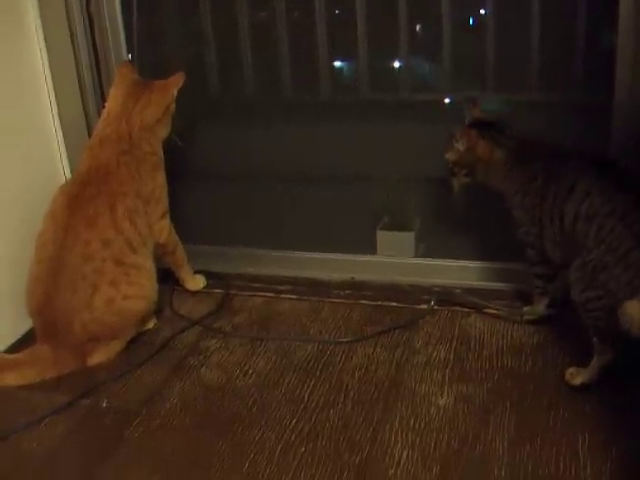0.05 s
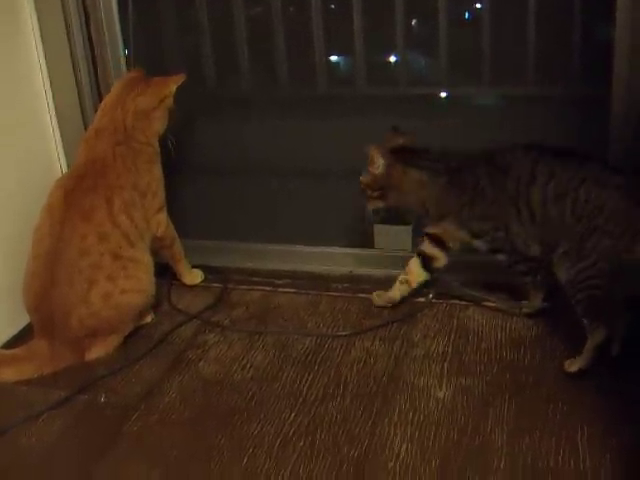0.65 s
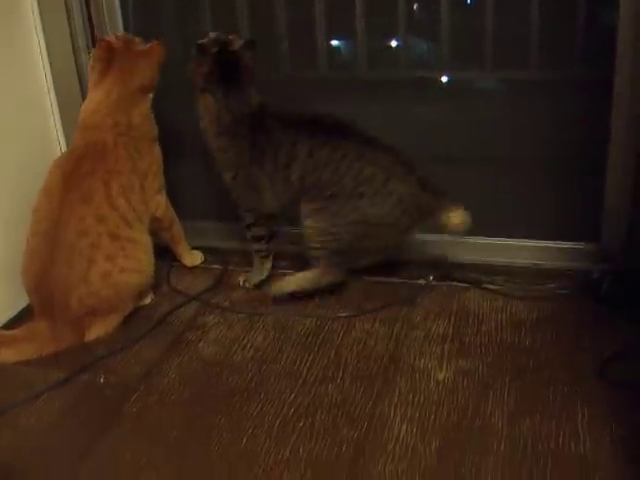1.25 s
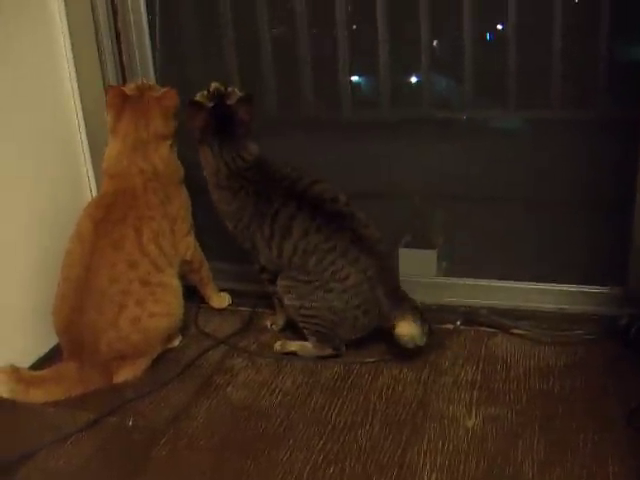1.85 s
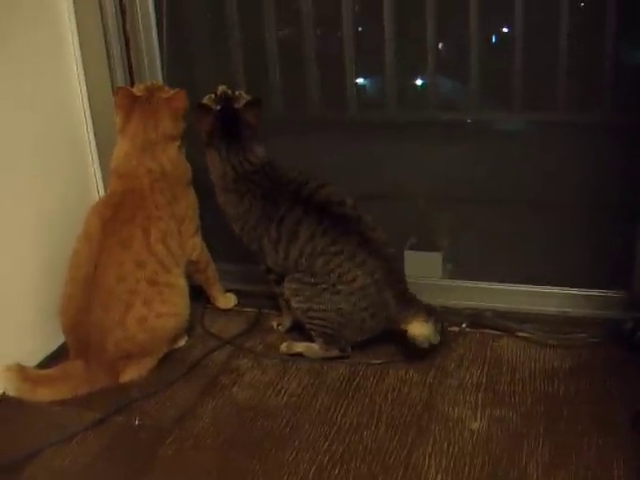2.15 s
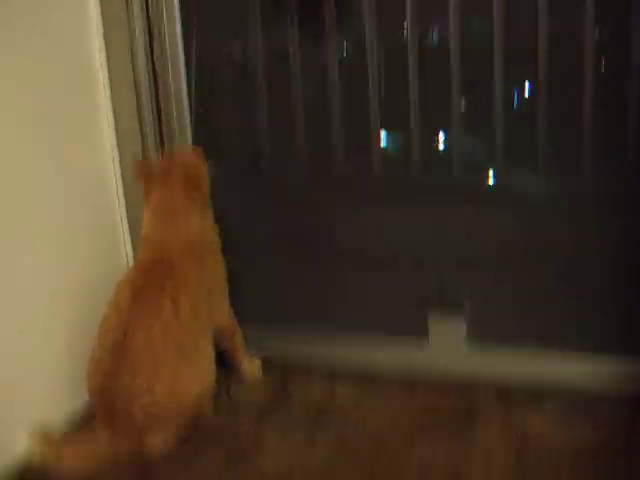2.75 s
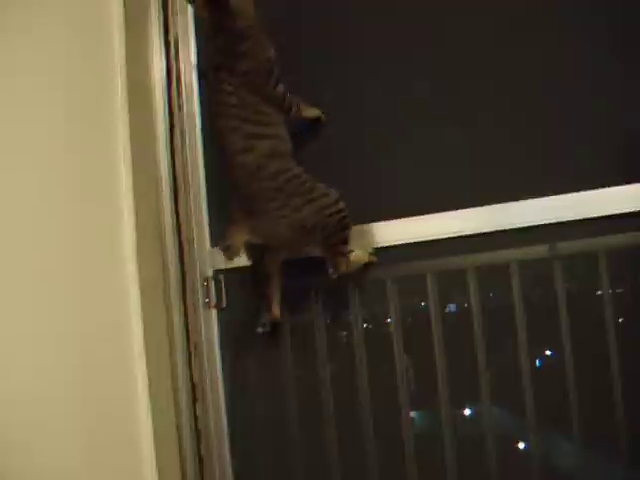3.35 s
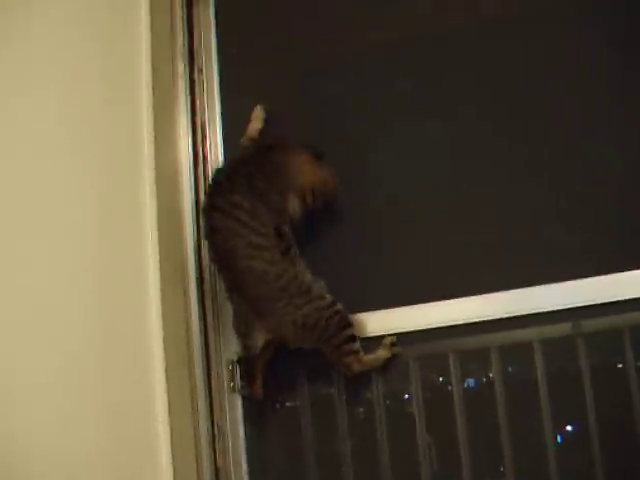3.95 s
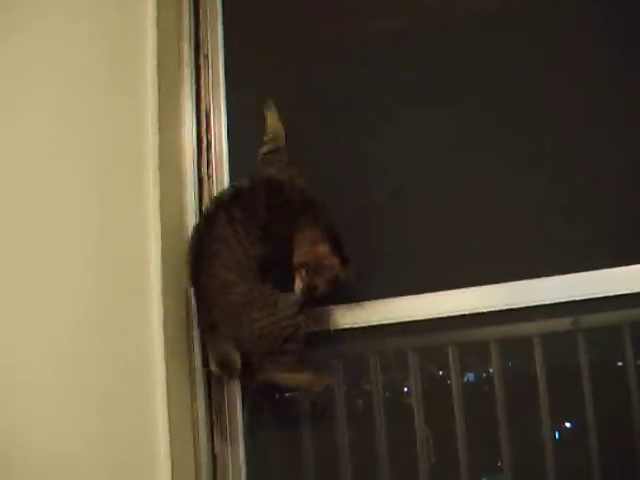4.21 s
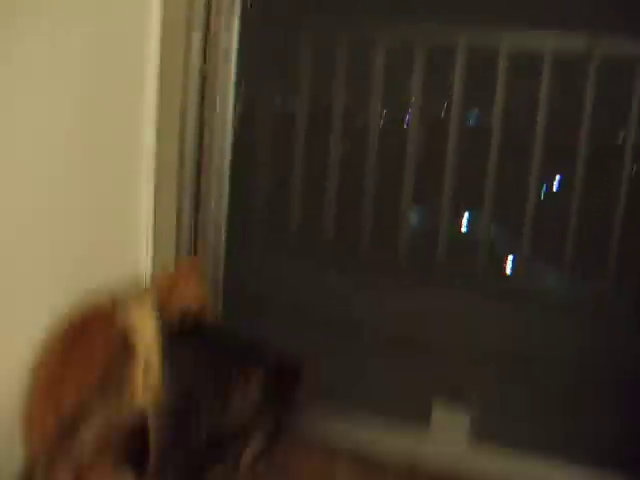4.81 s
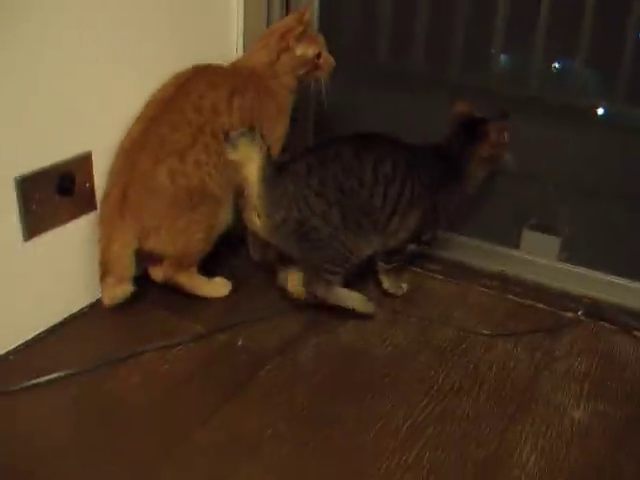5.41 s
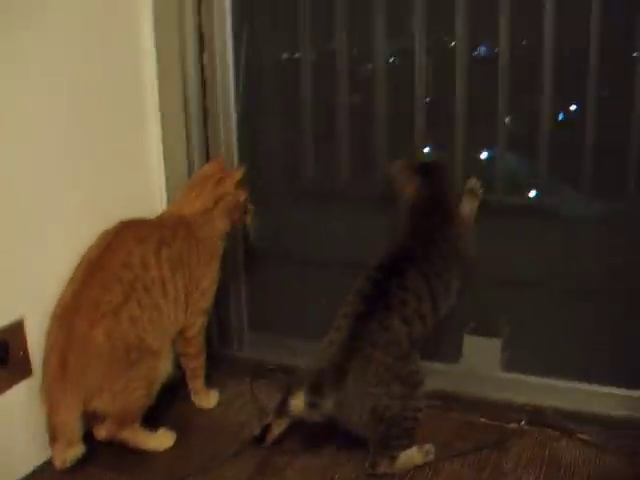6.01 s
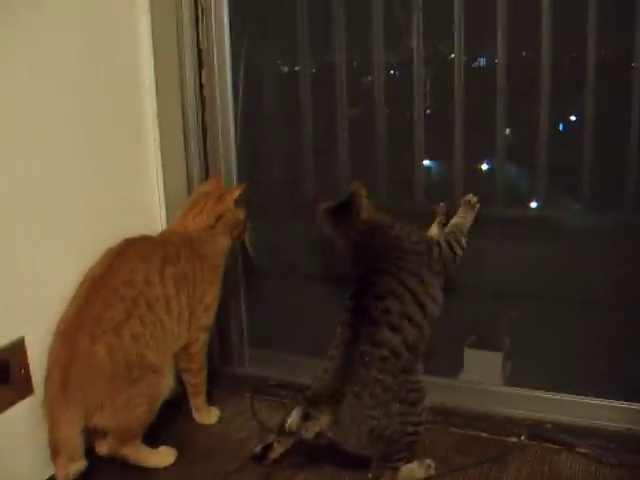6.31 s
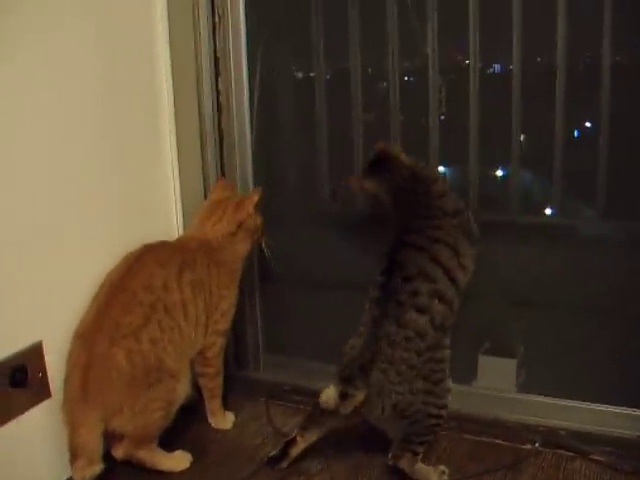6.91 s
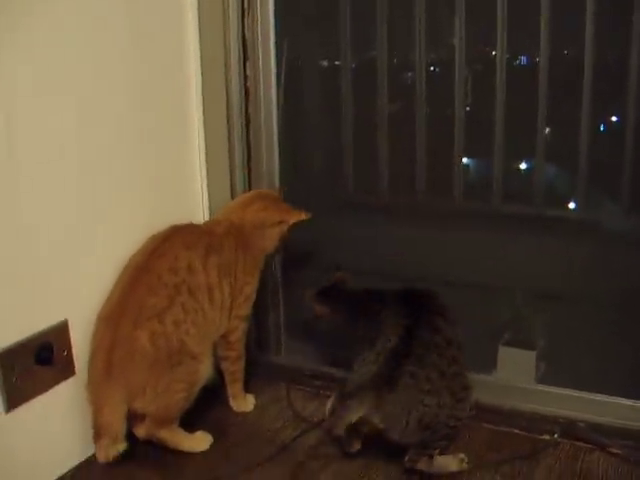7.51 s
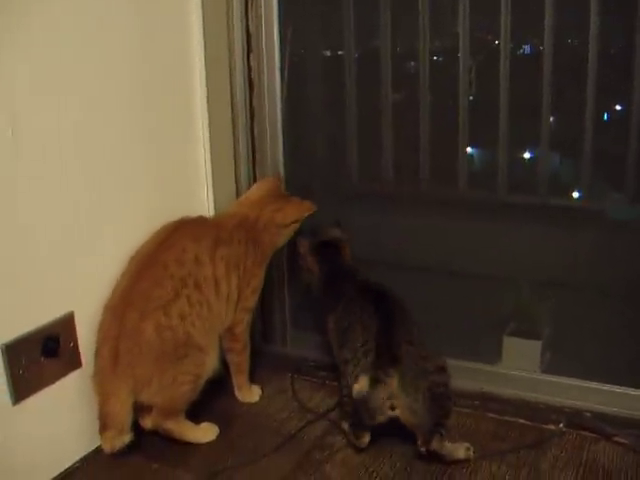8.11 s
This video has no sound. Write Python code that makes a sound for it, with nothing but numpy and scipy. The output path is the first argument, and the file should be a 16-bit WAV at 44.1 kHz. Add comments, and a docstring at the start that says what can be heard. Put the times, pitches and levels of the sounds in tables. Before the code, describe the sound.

In a small, quiet room a cat takes a few clicking steps, then climbs a window screen. Its claws pluck and scrape the mesh, and the metal frame rattles lightly. It drops onto the wooden floor with a loud thump, pads about, then plucks the screen a few more times, making it thrum and zing. The microphone is mid-room, with steady hiss and faint distant traffic behind.

```python
"""A small room at night. A cat leaps onto the window screen: its claws pluck and scrape the mesh
and rattle the metal frame. It drops to the wooden floor with a thump, pads about with tapping claws,
then stretches up and plucks the screen again; hard plucks set it thrumming and zinging.
The room answers; far traffic murmurs outside under a steady hiss and a faint electronic whine."""
import sys
import numpy as np
from scipy import signal
from scipy.fft import rfft, irfft, next_fast_len
from scipy.io import wavfile
from scipy.ndimage import map_coordinates

SR = 44100
rng = np.random.default_rng(int(sys.argv[2]) if len(sys.argv) > 2 else 0)


def wrap_up_sound(samples):
    """Save the sound to the file named by the first command line argument, as 16-bit audio."""
    columns = np.atleast_2d(samples).T
    # keep every value between -1 and 1, then stretch to whole-number steps
    tamed = np.clip(columns, -1, 1)
    steps = np.round(tamed * 32767).astype(np.int16)
    wavfile.write(sys.argv[1], SR, steps)


N = 359856
CLOCK_S = np.arange(N) / SR
AGE_S = np.arange(SR // 2) / SR  # time since a hit


def amp(db):
    """Decibels to gain."""
    return 10 ** (np.asarray(db) / 20)


def unit(x):
    """Scale to rms 1."""
    return x / np.sqrt(np.mean(x ** 2) + 1e-20)


def along(points, hz):
    """Interpolate (frequency [Hz], value) points on a log axis."""
    knots_hz, values = np.transpose(points)
    return np.interp(np.log(hz + 1), np.log(knots_hz + 1), values)


def fade(t60_s):
    """Exponential decay of a hit."""
    return np.exp(-np.log(1000) * AGE_S / t60_s)


def wobble(knots_per_s):
    """Smooth random curve."""
    knots = rng.standard_normal(int(N * knots_per_s / SR) + 4)
    return map_coordinates(knots, [CLOCK_S * knots_per_s])


def filtered(x, response):
    """Apply a frequency response."""
    size = next_fast_len(x.shape[-1] + SR // 4)
    hz = np.fft.rfftfreq(size, 1 / SR)
    return irfft(rfft(x, size) * response(hz), size)[..., :x.shape[-1]]


def coloured(x, *spectra):
    """Minimum-phase filter from summed (frequency [Hz], gain [dB]) spectra."""
    def response(hz):
        gain_db = sum(along(spectrum, hz) for spectrum in spectra)
        cepstrum = irfft(np.log(amp(gain_db)))
        cepstrum[1:] *= 2
        cepstrum[len(cepstrum) // 2:] = 0
        return np.exp(rfft(cepstrum))
    return filtered(x, response)


def burst(spectrum, t60_s):
    """Decaying coloured noise."""
    return coloured(rng.standard_normal(len(AGE_S)) * fade(t60_s), spectrum)


def add(track, time_s, sound):
    """Mix a sound in at time_s."""
    part = track[round(time_s * SR):][:len(sound)]
    part += sound[:len(part)]


def ring(modes, detune):
    """Damped modes of alternating sign, slightly detuned at each strike."""
    mode_hz, level_db, t60_s = np.transpose(modes)
    pitch_hz = mode_hz * np.exp(detune * rng.standard_normal(len(mode_hz)))
    gains = amp(level_db) * (-1) ** np.arange(len(mode_hz))
    waves = [np.sin(2 * np.pi * hz * AGE_S) * fade(decay_s) for hz, decay_s in zip(pitch_hz, t60_s)]
    return gains @ waves / np.linalg.norm(gains)


def room(x):
    """Diffuse room tail, building up over the first reflections."""
    # reverberation: (frequency [Hz], t60 [s])
    reverb_times = [(60, 0.62), (250, 0.37), (1000, 0.46), (4000, 0.25), (8000, 0.27)]
    hz, time_s, noise = signal.stft(rng.standard_normal(len(AGE_S)), SR, nperseg=256)
    decay = np.exp(-np.log(1000) * time_s / along(reverb_times, hz)[:, None])
    tail = signal.istft(noise * decay, SR, nperseg=256)[1][:len(AGE_S)]
    tail *= 1 - fade(0.0037)
    return signal.fftconvolve(x, tail / np.linalg.norm(tail))[:len(x)]


def night():
    """Steady hiss, faint electronic whine, far tyres and one thin distant squeal."""
    # background hiss: (frequency [Hz], relative density [dB])
    hiss_spectrum = [(12, -37), (20, 21), (22, -6.5), (54, -1), (93, -1.5), (263, -8), (307, 0),
                     (348, -11.5), (415, -5.5), (606, -11), (909, -7.5), (1360, -11.5), (6200, -17),
                     (7590, -15.5), (8400, -18.5), (10900, -73), (18500, -120)]
    # far cars passing: (time [s], level [dB])
    traffic = [(0, -52), (2.4, -52.5), (3.6, -59), (5.2, -56), (8.16, -57)]
    # tyre noise: (frequency [Hz], relative density [dB])
    tyre_spectrum = [(200, -20.5), (650, -11), (850, -5.5), (1000, -4.5), (1250, -17), (3000, -26.5)]
    # electronics: (frequency [Hz], level [dB])
    whine_tones = [(7677, -71), (8323, -75)]
    hiss = amp(-49.5) * unit(coloured(rng.standard_normal(N), hiss_spectrum))
    traffic_db = np.interp(CLOCK_S, *np.transpose(traffic)) + .8 * wobble(3)
    tyres = amp(traffic_db) * unit(coloured(rng.standard_normal(N), tyre_spectrum))
    whine = sum(amp(db) * np.sqrt(2) * np.sin(2 * np.pi * hz * CLOCK_S) for hz, db in whine_tones)
    squeal_hz = np.interp(CLOCK_S, [.05, .3], [2500, 2420]) + 22 * wobble(90)
    squeal_db = np.interp(CLOCK_S, [0, .1, .23, .4], [-86, -53, -61, -120])
    squeal = amp(squeal_db) * np.sin(2 * np.pi * np.cumsum(squeal_hz) / SR)
    return hiss + tyres + whine + squeal


def claw_snap(ping_hz, clack_db, edge_db, crack_t60_s, shiver_gain):
    """A claw cracks off its hold, which pings for a few milliseconds and shivers briefly."""
    # claw click: (frequency [Hz], gain [dB])
    claw_spectrum = [(60, -17), (200, 3.5), (350, 0.5), (900, 0.5), (2200, 1.5), (3000, 0), (3800, 2),
                     (4350, 6), (5300, -1), (7200, 0.5), (8500, -5), (11000, -45.5)]
    crack = rng.standard_normal(len(AGE_S)) * (fade(crack_t60_s) + shiver_gain * fade(t60_s=0.046))
    ping = 0.71 * np.sin(2 * np.pi * ping_hz * AGE_S) * fade(t60_s=.0033)
    attack = 1 - fade(0.0016)
    resonance = [(.78 * ping_hz, 0), (ping_hz, 3), (1.22 * ping_hz, 0)]
    click = coloured((crack + ping) * attack, claw_spectrum, resonance)
    touch = [(1100, clack_db + 8.5), (2550, clack_db + 12.5), (3500, 0.0065), (5000, 0.46),
             (6500, edge_db + 8.5)]
    return amp(18) * coloured(click / np.linalg.norm(click), touch)


def claw_taps():
    """Claws strike floor and sill: a short clack, duller and drier than a pluck."""
    # claw strikes: (time [s], level [dB], ping [Hz], midrange clack [dB])
    taps = [(1.0042, -36.5, 3430, -12), (1.0403, -22.5, 3860, -19), (1.0474, -15.5, 4350, -22),
            (1.148, -24, 3620, -14), (1.388, -31, 3780, -20), (2.5207, -31, 3360, -0.5),
            (2.602, -32, 6260, -11), (2.676, -33, 3230, -10), (2.75, -41, 4860, 3.5),
            (4.6507, -17, 3200, -1.5), (4.6566, -7, 6280, -13.5), (4.761, -18.5, 3340, -7),
            (4.9209, -29.5, 6500, -41), (5.012, -37, 4740, -5), (5.8961, -42.5, 2920, 6),
            (7.2946, -33.5, 5170, -10.5), (7.6243, -34, 2920, -5.5)]
    track = np.zeros(N)
    for time_s, level_db, ping_hz, clack_db in taps:
        snap = claw_snap(ping_hz, clack_db, edge_db=-9.5, crack_t60_s=0.0068, shiver_gain=0.17)
        click = amp(level_db) * snap
        add(track, time_s, click + amp(-11) * room(click))
    return track


def paws():
    """A padded blow pushes the boards, which boom at their low modes under a short pat."""
    # paws and body on boards and sill: (time [s], level [dB], knock [dB])
    steps = [(1.147, -20, -29), (1.383, -24, -7), (2.519, -29, -7), (2.743, -35, 1), (3.382, -29, 4.5),
             (3.595, -27.5, -4.5), (4.342, -24, -11), (4.604, -28.5, -23), (4.653, 0.5, -10.5),
             (4.691, -22, 5.5), (4.708, -7.5, -12.5), (4.778, -12.5, -15.5), (5.266, -32.5, 4),
             (7.293, -28.5, -13), (7.385, -23.5, -1.5), (7.625, -30.5, -7)]
    # floorboard modes: (frequency [Hz], level [dB], t60 [s])
    board_modes = [(61, -8, .6), (88, -11, .5), (119, 2, .3), (173, 0, .26), (236, -2, .18), (310, -6, .13),
                   (352, -6, .16), (424, -8, .13), (682, -8, .13)]
    # padded impact: (frequency [Hz], gain [dB])
    paw_spectrum = [(25, -12), (70, -6), (170, -6), (300, 2), (450, -1), (700, 5), (1100, -2.5),
                    (2500, -2.5), (8000, -4)]
    push_s, toe_db = 0.002, -38.5
    push = (1 - AGE_S / push_s) * np.exp(-AGE_S / push_s)
    attack = 1 - fade(0.0043)
    track = np.zeros(N)
    for time_s, level_db, knock_db in steps:
        pat = burst([(100, -5), (500, 0)], t60_s=.07)
        boom = ring(board_modes, detune=0.0044)
        thud = (2 * push + 3.32 * pat + 0.62 * boom) * attack
        treble_db = toe_db - level_db  # toes tap about equally, whatever weight follows
        touch = [(400, 0.0052), (650, knock_db), (1000, knock_db), (2200, treble_db)]
        add(track, time_s, amp(level_db - 5.5) * coloured(thud, paw_spectrum, touch))
    return track + amp(-6) * room(track)


def mesh_plucks():
    """Claws release the mesh: tauter strands ping higher and brighter; hard plucks crack more than ring."""
    # claw releases: (time [s], level [dB], ping [Hz])
    plucks = [(2.735, -29, 5370), (2.858, -9, 5240), (2.8626, -18.5, 6000), (2.891, -11.5, 4800),
              (2.9, -12.5, 4100), (3.041, -39, 4730), (3.1124, -41, 4520), (3.2197, -16.5, 5000),
              (3.331, -14.5, 4960), (3.4307, -41.5, 5110), (3.5169, -23, 6200), (3.5317, -24.5, 4400),
              (4.0607, -20, 6230), (4.1664, -20.5, 4900), (4.1924, -22, 6100), (4.2209, -27, 6560),
              (4.2607, -16, 4970), (4.2883, -9.5, 5030), (4.313, -20.5, 7200), (4.501, -21, 3360),
              (5.6978, -39, 4640), (6.4657, -12, 4250), (6.636, -44, 4630), (6.8086, -6, 4260),
              (7.173, -9, 4400), (7.954, -18.5, 5600)]
    typical_ping_hz, edge_db_per_octave = 4510, 5.5
    firm_pluck_db, tail_loss_db_per_db = -13, 0.55
    track = np.zeros(N)
    for time_s, level_db, ping_hz in plucks:
        edge_db = -3.5 + edge_db_per_octave * np.log2(ping_hz / typical_ping_hz)
        room_db = -6 - tail_loss_db_per_db * (level_db - firm_pluck_db)
        # light mesh: little midrange, more shiver than wood
        snap = claw_snap(ping_hz, clack_db=-23, edge_db=edge_db, crack_t60_s=0.011, shiver_gain=0.38)
        click = amp(level_db) * snap
        add(track, time_s, click + amp(room_db) * room(click))
    return track


def claw_drags():
    """Dragged claws bite in, tick over the weave in dense uneven grains and let go."""
    # drags over weave and sill: (time [s], hold [s], level [dB], midrange grating [dB])
    drags = [(2.75, 0.006, -33, 4), (2.82, 0.0054, -32, 7), (2.934, 0.046, -35, -10),
             (3.17, 0.067, -27, -2), (3.291, 0.048, -26, 1.5), (3.725, 0.012, -37, 2),
             (4.099, 0.08, -38, 7.5), (4.27, 0.08, -27, -1), (4.495, 0.012, -26, -4),
             (4.696, .01, -31.5, 7), (4.747, 0.018, -25, 8), (5.806, 0.0048, -33.5, 0),
             (5.835, 0.0047, -28.5, -4), (6.083, .04, -43.5, 1), (6.211, 0.0039, -42.5, 3)]
    # scraped weave: (frequency [Hz], gain [dB])
    weave_spectrum = [(100, -1.5), (600, -7), (1200, -2), (2400, -1.5), (3400, 0), (4500, 8.5), (5500, 4.5),
                      (7000, 7), (9000, -4)]
    attack_s, release_tau_s, strands_per_s = .008, 0.0091, 1800
    bite = np.minimum(AGE_S / attack_s, 1)
    track = np.zeros(N)
    for time_s, hold_s, level_db, grate_db in drags:
        release = np.exp(-np.maximum(AGE_S - attack_s - hold_s, 0) / release_tau_s)
        crossings = rng.random(len(AGE_S)) < strands_per_s / SR
        ticks = crossings * rng.standard_normal(len(AGE_S))
        grating = [(500, 0.022), (1500, grate_db), (3000, grate_db), (4300, 0.006)]
        rasp = unit(coloured(ticks, weave_spectrum, grating))
        add(track, time_s - attack_s, amp(level_db) * bite * release * rasp)
    return amp(-7) * track + amp(-7.5) * room(track)


def frame_rattle():
    """The metal frame scuffs and clinks in its track."""
    # frame chatter: (time [s], scuff [dB], clink [dB])
    rattles = [(2.903, -6.5, -28), (2.924, -29.5, -38), (3.5614, -18, -25), (3.570, -19.5, -39),
               (4.287, -36.5, -33), (4.499, -33, -42)]
    # metal on its track: (frequency [Hz], gain [dB])
    scuff_spectrum = [(100, -42), (700, -37), (1500, -15), (2900, -3.5), (4500, 1), (8000, -8.5)]
    # frame modes: (frequency [Hz], level [dB], t60 [s])
    frame_modes = [(2640, -6, .1), (3030, -4, .16), (3178, -7, .12), (3335, 0, .2), (3385, -4, .2),
                   (3500, -5, .13), (4260, -7, .16), (4590, -9, .13), (6110, -6, .12), (6570, -6, .16),
                   (6985, -5, .15)]
    track = np.zeros(N)
    for time_s, scuff_db, clink_db in rattles:
        scuff = burst(scuff_spectrum, t60_s=.07)
        clink = ring(frame_modes, detune=0.0024)
        add(track, time_s, amp(scuff_db) * scuff + amp(clink_db) * clink)
    return track + amp(-1.5) * room(track)


def screen_twang():
    """After a hard pluck the whole screen thrums low while its taut strands zing."""
    # hard plucks: (time [s], thrum [dB], zing [dB])
    twangs = [(4.289, -36, -25.5), (6.467, -47, -47), (6.808, -31, -24), (7.174, -39, -26)]
    # stretched screen modes: (frequency [Hz], level [dB], t60 [s])
    screen_modes = [(282, -5, .12), (310, 0, .2), (372, -3, .16), (470, -8, .08), (650, -3, .07)]
    # taut strands: (frequency [Hz], gain [dB])
    zing_spectrum = [(1000, -40), (3200, -16), (3900, -1), (4350, 1), (4900, -5), (5500, -12), (6500, -3),
                     (7100, -2), (8200, -14)]
    flutter_spectrum = [(100, -15.5), (320, 17), (480, -5), (700, 10), (1500, -11.5), (3000, -7)]
    track = np.zeros(N)
    for time_s, thrum_db, zing_db in twangs:
        flutter = burst(flutter_spectrum, t60_s=0.14)
        thrum = .7 * ring(screen_modes, detune=.015) + flutter
        zing = burst(zing_spectrum, t60_s=0.27)
        add(track, time_s, amp(thrum_db) * thrum + amp(zing_db) * zing)
    return track + amp(3.5) * room(track)


def scene():
    """All sources from mid-room, mono."""
    cat = mesh_plucks() + claw_taps() + claw_drags() + frame_rattle() + screen_twang() + paws()
    return (cat + night())[None]


def record(dry):
    """Narrow-band microphone, clipping of the hardest peaks, low-pass."""
    # microphone roll-off: (frequency [Hz], gain [dB])
    microphone = [(7600, 0), (8300, -6), (8800, -21), (9300, -44)]
    microphone_top_hz, clip_level, output_top_hz = 9400, .72, 16000
    heard = filtered(dry, lambda hz: amp(along(microphone, hz)) * (hz < microphone_top_hz))
    clipped = np.clip(heard, -clip_level, clip_level)
    return filtered(clipped, lambda hz: hz < output_top_hz)


dry = scene()
out = record(dry)
wrap_up_sound(out)
```